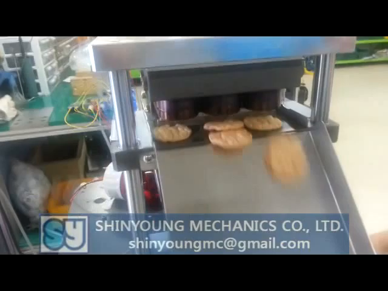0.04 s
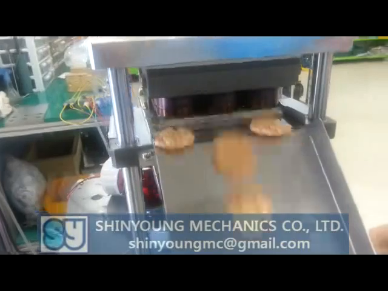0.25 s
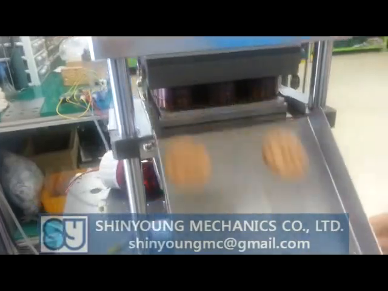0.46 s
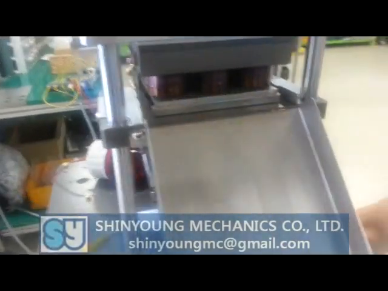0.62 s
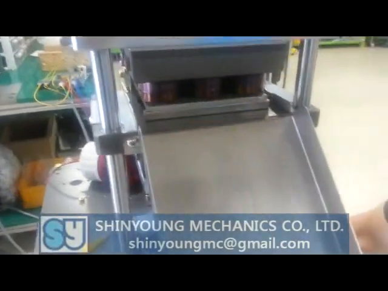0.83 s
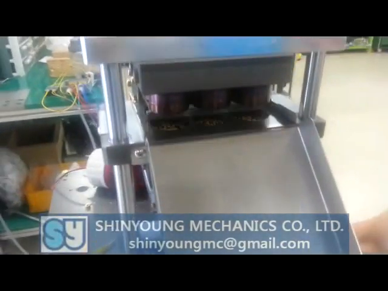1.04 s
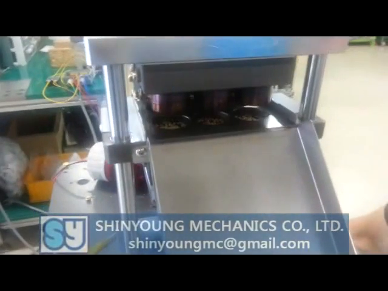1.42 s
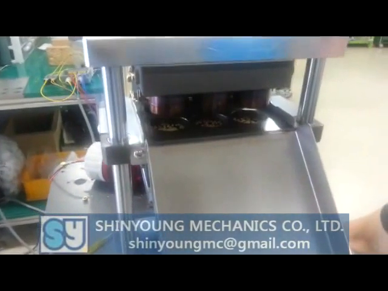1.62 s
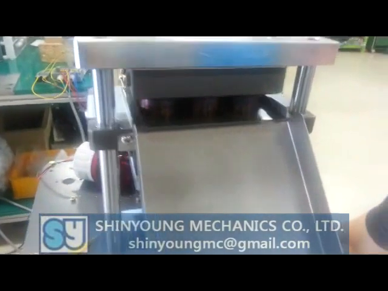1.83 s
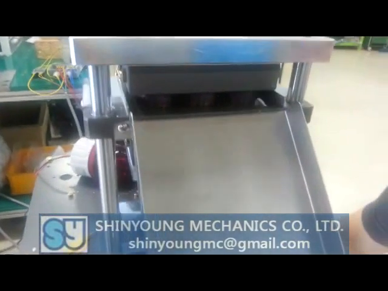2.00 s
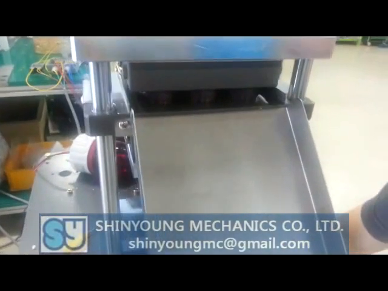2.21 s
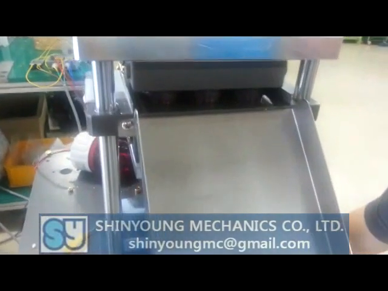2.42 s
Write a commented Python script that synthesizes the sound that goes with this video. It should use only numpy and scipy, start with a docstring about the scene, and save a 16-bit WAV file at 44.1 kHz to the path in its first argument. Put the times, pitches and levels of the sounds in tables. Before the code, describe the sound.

Metal clacks and air spits from a cake popping machine, over its whine and workshop fans.

```python
"""One cycle of a puffed-cake press, over drive whine and workshop fans.
First, cakes tap down the steel chute and air valves spit. From 0.5 s the feed slide rattles
across, slams into its stop and rings the frame. Air hisses to the cylinders. Near 1.65 s valves
spit again, steel knocks and the housing booms as the mould starts down.
At 2.07 s the mould clamps shut with a short crunch; two light taps follow."""
import sys
import numpy as np
from scipy import signal
from scipy.fft import rfft, irfft, next_fast_len
from scipy.io import wavfile

SR = 44100
rng = np.random.default_rng(int(sys.argv[2]) if len(sys.argv) > 2 else 0)


def waveform_to_disk(signal):
    """Save audio, clipped to [-1, 1], as 16-bit WAV at the path in sys.argv[1]."""
    frames = np.transpose(np.atleast_2d(signal))
    scaled = np.clip(frames, -1, 1) * 32767
    samples = np.round(scaled).astype(np.int16)
    wavfile.write(sys.argv[1], SR, samples)


N = 112454
TIME_S = np.arange(N) / SR
HIT_RISE_S, CUTOFF_HZ = 0.0027, 14600

# steel knocks: start_s, level_db, t60_s, tilt_db_per_octave, ring_share_db
KNOCKS = [(.485, -20, 0.092, 3.5, -9), (.502, -12, 0.062, 4, -27), (.522, -19, 0.11, -6, 0.5),
          (.58, -21, 0.21, 1, -5.5), (.649, -21, 0.35, 2.5, -32), (.674, -9, 0.015, -4.5, -14),
          (.6795, -9.5, 0.074, 1.5, 4.5), (.689, -18, 0.11, 4, -3), (.728, -21.5, 0.083, -0.5, -20),
          (.748, -24, .1, 2.5, -19), (1.66, -21, 0.26, -2, -15.5)]
# struck or rubbed steel: freq_hz, density_db
STEEL_SPECTRUM = [(60, -55), (160, -44), (250, -21), (480, -9), (630, -0.5), (800, -4), (1080, 2),
                  (1430, -9), (1900, -1.5), (2150, -10), (2800, -5.5), (3700, -17.5), (4900, -12),
                  (6000, -20.5), (7700, -26), (10000, -27.5), (14000, -33.5)]
# frame modes: pitch_hz, level_db, t60_s
FRAME_MODES = [(631, -36.5, .25), (660, -42, .18), (753, -42, .3), (904, -42, .55), (1028, -40, .36),
               (1130, -39, .33), (1281, -45, .2), (1321, -46, .4), (1362, -45, 2), (1410, -47, .2),
               (1938, -45, .36), (2778, -47, .25), (3010, -48, .4), (5000, -46, .12)]
# stand thuds: start_s, level_db, t60_s
THUDS = [(0.518, -39.5, 0.093), (.676, -35, 0.047), (0.698, -34, 0.028)]
# stand thuds: freq_hz, density_db
THUD_SPECTRUM = [(25, -16), (60, -18), (100, 19), (160, -1), (300, -27), (1000, -50)]
# clamp crunch: freq_hz, density_db
CLAMP_SPECTRUM = [(60, -58), (170, -36), (400, -28), (580, -26), (735, 16.5), (830, -14), (900, 5.5),
                  (1000, -11), (1130, 6.5), (1270, -11), (1370, 0), (1490, 3), (1700, -5.5), (2200, 1),
                  (2400, -6), (2560, 1), (2800, -10), (3050, -6), (3400, -8.5), (4200, -13.5), (6000, -19),
                  (9000, -21), (14500, -52)]
# mould modes: pitch_hz, level_db, t60_s
MOULD_MODES = [(616, -48, .2), (738, -41, .3), (822, -48, .35), (902, -45, .2), (1130, -44, .23),
               (1270, -45, .18), (1480, -43, .19), (1637, -49, .4), (1830, -47, .15), (2196, -47, .3),
               (2309, -50, .5), (2550, -45, .15), (3050, -49, .15), (3343, -51, .3)]
# chute taps: start_s, level_db, t60_s
TAPS = [(.153, -33, 0.034), (0.202, -28.5, 0.055), (.303, -32, 0.1), (0.333, -26.5, 0.12),
        (0.36, -16.5, 0.046), (0.379, -31.5, 0.11), (.4, -40, 0.13), (0.902, -35, 0.054),
        (0.933, -44, 0.055), (1.047, -30.5, 0.069), (1.062, -29.5, 0.096), (1.906, -39, 0.056),
        (2.472, -37, 0.11), (2.507, -30.5, 0.13)]
# chute taps: freq_hz, density_db
TAP_SPECTRUM = [(100, -51), (600, 0.5), (1100, -8), (1750, 5.5), (2400, -3.5), (3100, -2), (3600, 1.5),
                (4500, 1), (5800, -18), (8300, -9), (10000, -29), (14500, -65)]
# valve spits: start_s, level_db, rise_s, hold_s, t60_s, tilt_db_per_octave, pan_db
SPITS = [(0.185, -29.5, 0.02, 0.0073, 0.11, 3, 4), (0.468, -27.5, 0.0075, 0.013, 0.15, 1.5, 6),
         (0.486, -20.5, 0.011, .035, .17, -1, 4.5), (0.891, -27.5, .006, 0.019, 0.21, 1.5, 2),
         (1.621, -30.5, 0.0023, 0.019, 0.13, 10, 1), (1.639, -20.5, 0.0073, 0.0031, 0.19, 3.5, -1.5)]
# valve spits: freq_hz, density_db
SPIT_SPECTRUM = [(100, -60), (300, -58), (1000, 7), (2500, 0.5), (4500, -0.5), (6000, -10), (7800, -5.5),
                 (10000, -11), (14500, -17)]
# cylinder air: time_s, level_db
FLOW_LEVELS = [(0, -30), (.19, -80), (.22, -34), (.3, -41), (.39, -33.5), (.46, -38.5), (.55, -29),
               (.76, -30), (.86, -34.5), (.94, -31), (1.2, -30.5), (1.36, -33.5), (1.6, -34), (1.75, -32),
               (1.88, -38.5), (2.14, -34), (2.25, -68), (2.55, -45)]
# cylinder air: freq_hz, density_db
FLOW_SPECTRUM = [(80, -45), (160, -25), (250, -8), (500, -2.5), (900, 3), (1300, 0), (2000, -0.5),
                 (3000, -3), (4600, -5), (5800, -8), (7600, -8.5), (9500, -11.5), (11300, -15.5),
                 (12300, -23), (14500, -26.5)]
# drive stages: start_s, load_fraction, pan_db, [(harmonic, level_db)]
DRIVE_STAGES = [(0, 0.048, 2.5, [(1, -46.5), (2, -34), (3, -47.5), (4, -44.5), (6, -48)]),
                (.55, .2, -1, [(2, -42.5), (3, -38), (6, -46.5), (7, -45), (9, -51), (11, -46.5),
                (12, -48.5), (18, -51), (19, -54)]), (1.691, 0.91, -13, [(2, -42.5), (3, -44.5), (4, -38),
                (7, -45.5), (8, -55), (9, -59), (11, -47), (12, -52.5)]), (2.12, 0.012, -8.5, [(1, -53),
                (2, -44), (3, -51), (4, -42), (6, -45.5), (7, -51), (9, -45.5)])]
# steady motor tones: pitch_hz, level_db
MOTOR_TONES = [(506, -47.5), (737.5, -49), (7822, -59), (7940, -57), (8059, -63), (8177, -59)]
# fans and machinery: freq_hz, density_db
SHOP_SPECTRUM = [(30, -31), (70, -34), (110, -25.5), (170, -25), (240, -7.5), (300, -6.5), (385, -5.5),
                 (560, -5), (720, 4), (850, 0.5), (1100, -9.5), (1350, -5.5), (2300, -8.5), (3000, -8),
                 (3800, -13.5), (4600, -12.5), (5400, -23), (7200, -20.5), (8050, -12), (9000, -31),
                 (11000, -51), (14500, -84)]
# left-right likeness of noise: freq_hz, correlation
STEREO_CORRELATION = [(40, 0.016), (200, 0.81), (600, 0.69), (1200, 0.24), (2500, 0), (12000, 0)]
# left-right balance of noise: freq_hz, pan_db
STEREO_BALANCE = [(100, -1.5), (500, 2.5), (1400, -2.5), (3000, -1.5), (6000, -2.1), (13000, 0)]


def steel_knocks():
    """Each knock is a dense clatter that leaves the frame ringing."""
    clatter = sum(envelope(start_s, level_db, HIT_RISE_S, 0, t60_s) * noise(STEEL_SPECTRUM, tilt)
                  for start_s, level_db, t60_s, tilt, _ in KNOCKS)
    starts_s, *_, ring_share_db = np.transpose(KNOCKS)
    return clatter + from_db(-1) * ring_modes(FRAME_MODES, starts_s, from_db(ring_share_db))


def slide_rub():
    """The feed slide rubs on metal and grain: abrupt start, slow fade."""
    stroke = envelope(start_s=.52, level_db=-34.68, rise_s=0, hold_s=0, t60_s=2.04)
    return stroke * friction(STEEL_SPECTRUM, tilt_db_per_octave=-3)


def mould_clamp(start_s=2.072, rise_s=.022, hold_s=.052):
    """The mould crunches shut; eight small slips set it ringing."""
    slips_s = start_s + (rise_s + hold_s) * np.linspace(.1, .9, 8) + rng.uniform(-.004, .004, size=8)
    slip_gains = np.hanning(10)[1:-1]
    stroke = envelope(start_s, level_db=-22.5, rise_s=rise_s, hold_s=hold_s, t60_s=.69)
    crunch = stroke * friction(CLAMP_SPECTRUM, tilt_db_per_octave=1)
    return crunch + from_db(-1.36) * ring_modes(MOULD_MODES, slips_s, slip_gains)


def chute_taps():
    """Cakes and loose parts tap the chute and die out quickly."""
    hits = sum(envelope(start_s, level_db, HIT_RISE_S, 0, t60_s) for start_s, level_db, t60_s in TAPS)
    return hits * noise(TAP_SPECTRUM)


def valve_spits():
    """Each valve lets out a bright burst of air."""
    return sum(envelope(*shape) * noise(SPIT_SPECTRUM, tilt) * pan(pan_db)
               for *shape, tilt, pan_db in SPITS)


def cylinder_hiss():
    """Air hisses as it flows to the cylinders."""
    level_db = np.interp(TIME_S, *np.transpose(FLOW_LEVELS))
    return from_db(level_db) * noise(FLOW_SPECTRUM) * pan(-.5)


def stand_thuds(rise_s=.004):
    """Short low thuds pass through the stand."""
    hits = sum(envelope(start_s, level_db, rise_s, 0, t60_s) for start_s, level_db, t60_s in THUDS)
    return hits * noise(THUD_SPECTRUM)


def housing_boom(pitch_hz=244):
    """The housing booms as the mould starts down."""
    return envelope(start_s=1.672, level_db=-40, rise_s=.008, hold_s=0, t60_s=1) * tone(pitch_hz * TIME_S)


def drive_whine(unloaded_hz=384.5, full_load_sag_hz=1.608, jitter_hz=.25, crossfade_s=.037):
    """The whine sags under load; each stage brings out other harmonics."""
    begun = [np.clip((TIME_S - start_s) / crossfade_s + .5, 0, 1) for start_s, *_ in DRIVE_STAGES[1:]]
    shares = -np.diff([np.ones(N), *begun, np.zeros(N)], axis=0)
    load, gains = 0, {}
    for share, (_, stage_load, pan_db, harmonics) in zip(shares, DRIVE_STAGES):
        load = load + share * stage_load
        for harmonic, level_db in harmonics:
            gains[harmonic] = gains.get(harmonic, 0) + share * from_db(level_db) * pan(pan_db)
    cycles = np.cumsum(unloaded_hz - full_load_sag_hz * load + jitter_hz * drift(11.4)) / SR
    return sum(gain * tone(harmonic * cycles) for harmonic, gain in gains.items())


def motor_whine():
    """Motor tones at constant pitch."""
    return sum(from_db(level_db) * tone(pitch_hz * TIME_S) for pitch_hz, level_db in MOTOR_TONES)


def shop_noise(level_db=-35.5, flutter_db=1):
    """Fans and machinery: broad noise, slight flutter."""
    return from_db(level_db + flutter_db * drift(60)) * noise(SHOP_SPECTRUM)


def room_tail(source, level_db=-14, t60_s=.48, delay_s=.006, lowpass_hz=5000):
    """Diffuse, dull workshop reverberation."""
    age_s = TIME_S[:SR]
    tail = rng.standard_normal((2, SR)) * from_db(-60 * age_s / t60_s) * (age_s > delay_s)
    tail /= np.sqrt(np.sum(tail ** 2) / 2)
    tail = signal.sosfilt(signal.butter(1, lowpass_hz, fs=SR, output="sos"), tail)
    return from_db(level_db) * signal.fftconvolve(source, tail, axes=1)[:, :N]


def friction(spectrum, tilt_db_per_octave, roughness_db=.5):
    """Uneven slips excite a body's resonances."""
    return unit_rms(from_db(-roughness_db * drift(84))) * noise(spectrum, tilt_db_per_octave)


def ring_modes(modes, strikes_s, gains, scatter_db=2.7):
    """Every strike rings every mode, with random strength per side; mode levels are overall rms."""
    ringing = 0
    denormal_guard = 1e-18 * (-1.) ** np.arange(N)
    for pitch_hz, level_db, t60_s in modes:
        clicks = np.zeros((2, N))
        scatter = from_db(rng.normal(0, scatter_db, (len(gains), 2)).T)
        clicks[:, (strikes_s * SR).astype(int)] = gains * scatter
        clicks = signal.lfilter(*signal.butter(2, pitch_hz / 2, "high", fs=SR), clicks + denormal_guard)
        radius, step_rad = from_db(-60 / (t60_s * SR)), 2 * np.pi * pitch_hz / SR
        mode = signal.lfilter([0, np.sin(step_rad)], [1, -2 * radius * np.cos(step_rad), radius ** 2], clicks)
        ringing = ringing + from_db(level_db) * unit_rms(mode)
    return ringing


def tone(cycles, waver_db=1.5, spread_rad=.37):
    """Wavering sine, rms near 1, own phase per side."""
    phase_rad = 2 * np.pi * (cycles + rng.random())
    offset_rad = spread_rad * (1 + .5 * drift(.33)) * np.array([[1], [-1]])
    return np.sqrt(2) * np.sin(phase_rad + offset_rad) * from_db(waver_db * drift(42))


def noise(spectrum, tilt_db_per_octave=0, tilt_above_hz=870):
    """Shaped stereo noise, wide in the treble; mid rms 1."""
    size = next_fast_len(N, real=True)
    freq_hz = np.maximum(np.fft.rfftfreq(size, 1 / SR), 1)
    mid, side = rfft(rng.standard_normal((2, size)))
    correlation = at_hz(STEREO_CORRELATION, freq_hz)
    width = np.sqrt((1 - correlation) / (1 + correlation))
    bins = (mid + width * side * [[1], [-1]]) * pan(at_hz(STEREO_BALANCE, freq_hz))
    shape_db = at_hz(spectrum, freq_hz) + tilt_db_per_octave * np.log2(np.maximum(freq_hz, tilt_above_hz))
    stereo = irfft(bins * from_db(shape_db) * (freq_hz < CUTOFF_HZ), size)[:, :N]
    return stereo / stereo.mean(axis=0).std()


def envelope(start_s, level_db, rise_s, hold_s, t60_s):
    """Linear rise, hold, exponential release."""
    age_s = TIME_S - start_s
    attack = np.clip(age_s / max(rise_s, 1e-4), 0, 1)
    decay_db = 60 * np.maximum(age_s - rise_s - hold_s, 0) / t60_s
    return attack * from_db(level_db - np.minimum(decay_db, 200))


def drift(rate_hz, hop=40, warmup=2000):
    """Smooth random motion, rms 1."""
    pole = np.exp(-2 * np.pi * rate_hz * hop / SR)
    white = rng.standard_normal(N // hop + 2 + warmup)
    slow = signal.lfilter([1], [1, -2 * pole, pole ** 2], white)[warmup:]
    return np.interp(np.arange(N) / hop, np.arange(len(slow)), unit_rms(slow))


def at_hz(table, freq_hz):
    """Table lookup on a log-frequency axis."""
    points_hz, values = np.transpose(table)
    return np.interp(np.log(freq_hz), np.log(points_hz), values)


def pan(pan_db):
    """Stereo gains; pan_db is left minus right."""
    return from_db(np.array([[.5], [-.5]]) * pan_db)


def from_db(db):
    return 10 ** (np.asarray(db) / 20)


def unit_rms(x):
    return x / np.sqrt(np.mean(x ** 2) + 1e-20)


def scene(dip_at_s=1.648, dip_span_s=.014, dip_db=14):
    """Press and workshop; the background dips briefly, and only the metal reverberates."""
    shop = shop_noise()
    metal = chute_taps() + steel_knocks() + housing_boom() + slide_rub() + mould_clamp()
    dip = from_db(-dip_db * np.exp(-((TIME_S - dip_at_s) / dip_span_s) ** 2))
    background = (shop + drive_whine() + motor_whine()) * dip
    air = cylinder_hiss() + valve_spits()
    return metal + air + stand_thuds() + background + room_tail(metal)


def record(dry, peak_limit=.57):
    """Soft peak limit, then a steep low-pass."""
    rounded = dry / (1 + (dry / peak_limit) ** 6) ** (1 / 6)
    return signal.sosfilt(signal.ellip(10, .1, 90, CUTOFF_HZ, fs=SR, output="sos"), rounded)


dry = scene()
out = record(dry)
waveform_to_disk(out)
```